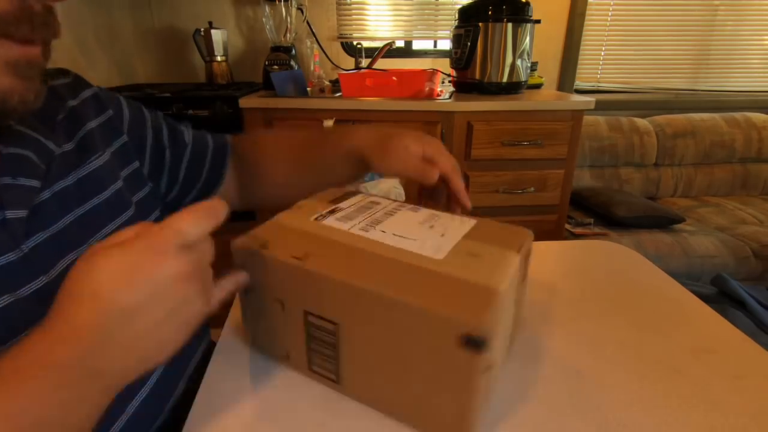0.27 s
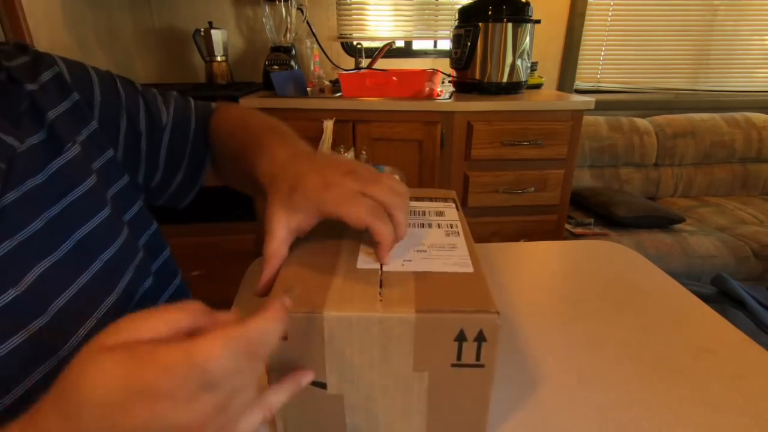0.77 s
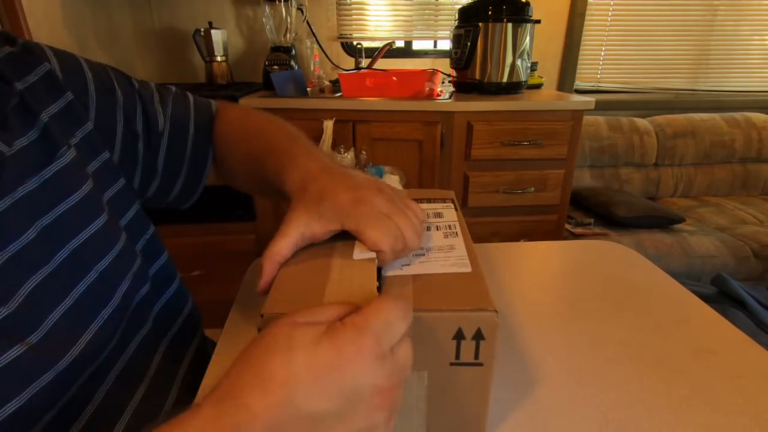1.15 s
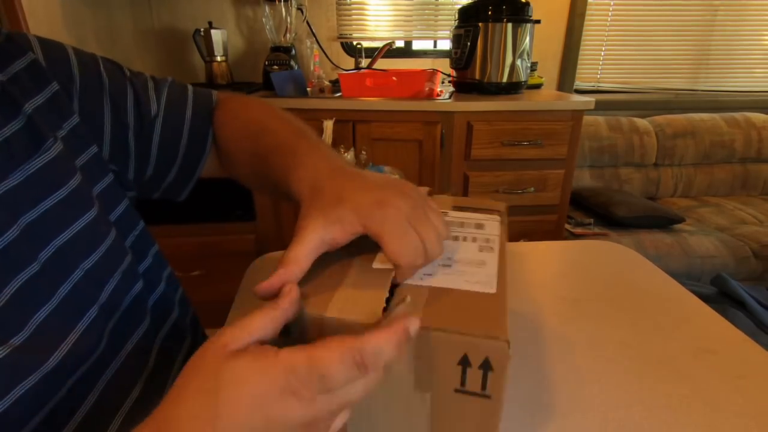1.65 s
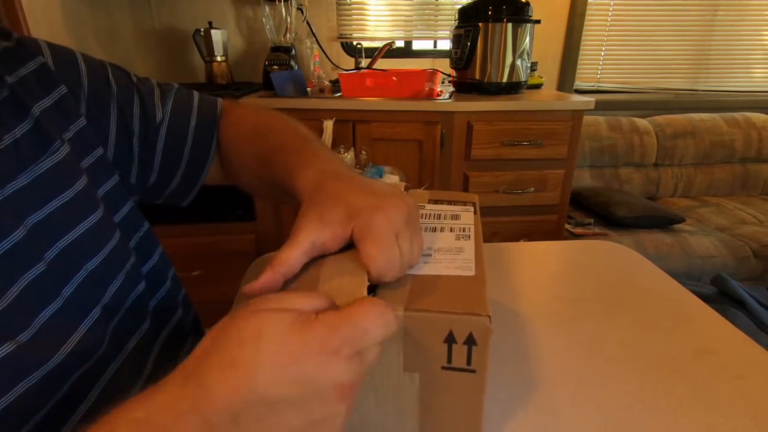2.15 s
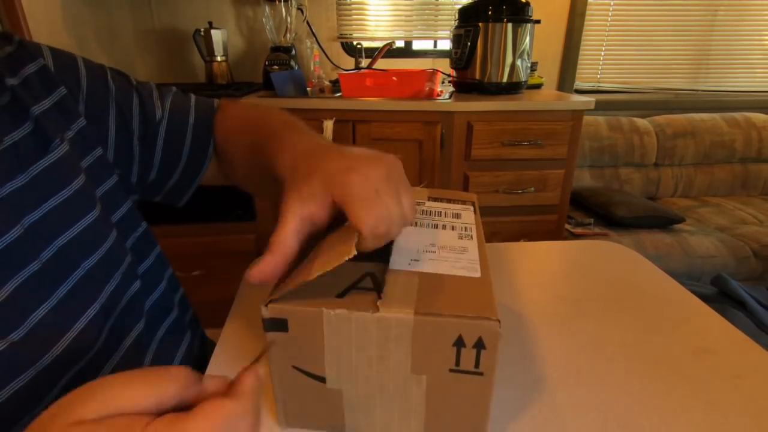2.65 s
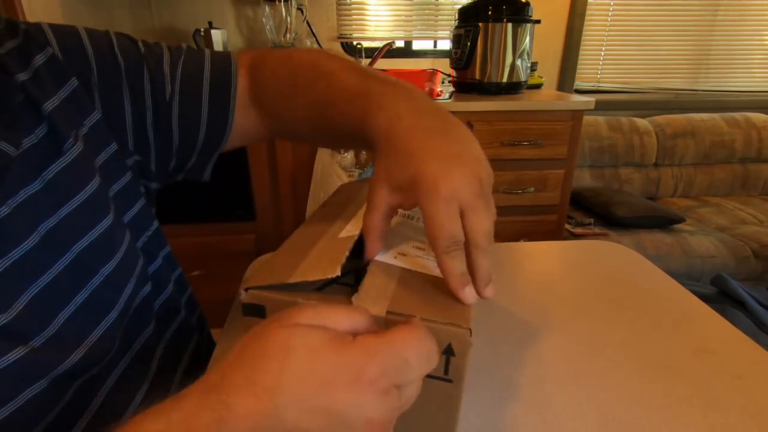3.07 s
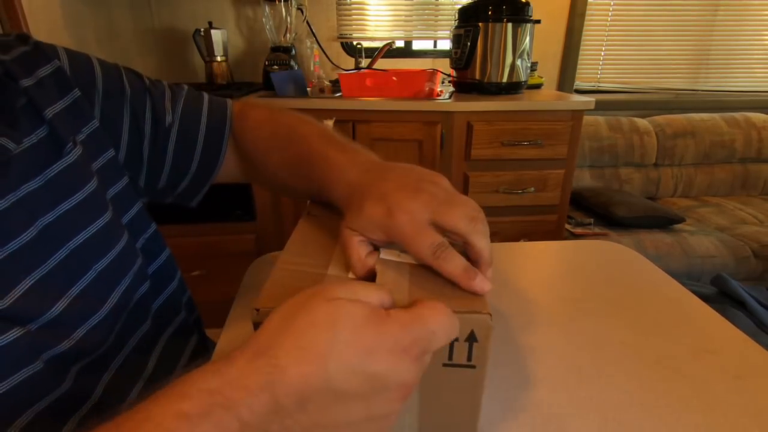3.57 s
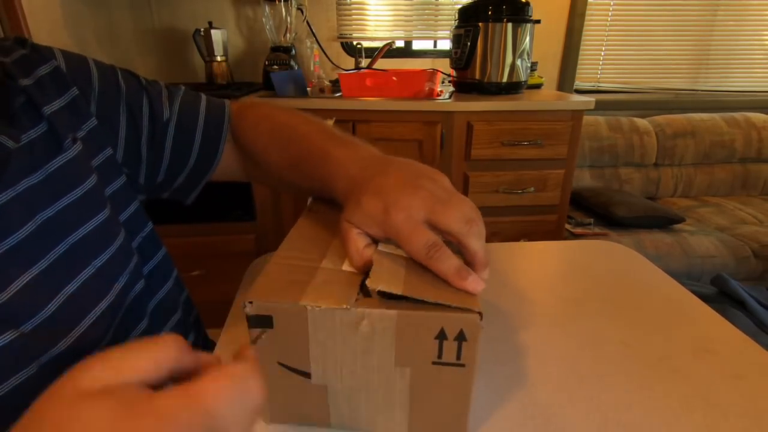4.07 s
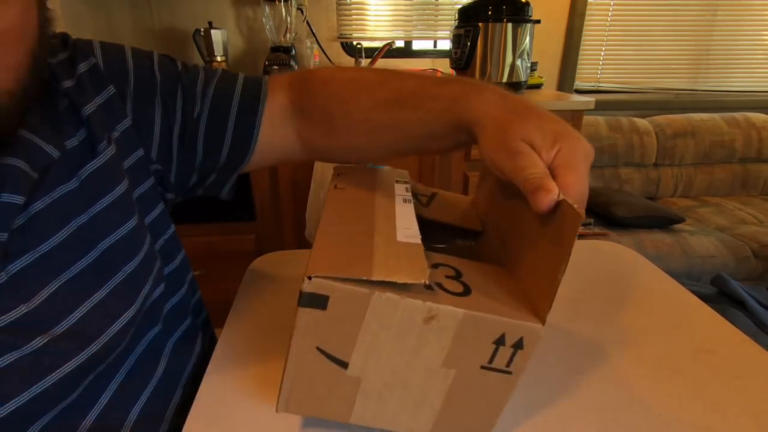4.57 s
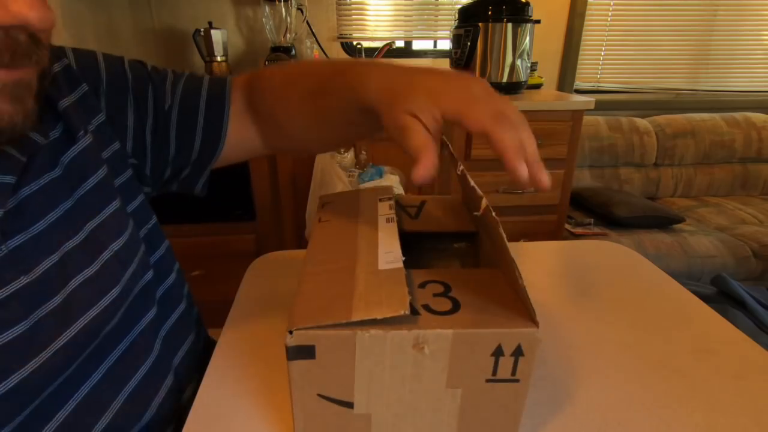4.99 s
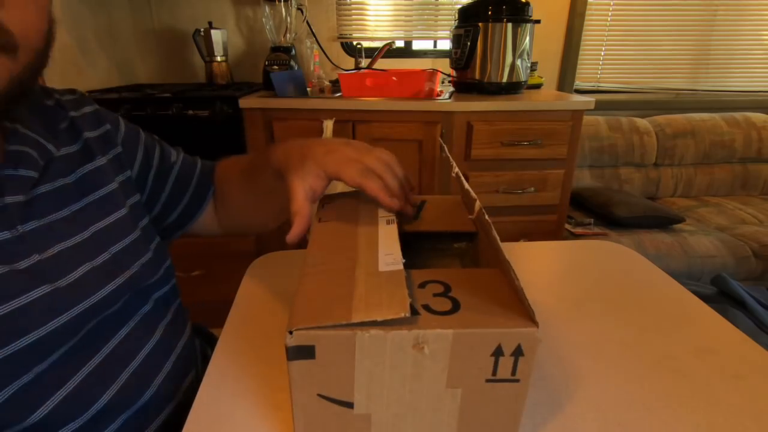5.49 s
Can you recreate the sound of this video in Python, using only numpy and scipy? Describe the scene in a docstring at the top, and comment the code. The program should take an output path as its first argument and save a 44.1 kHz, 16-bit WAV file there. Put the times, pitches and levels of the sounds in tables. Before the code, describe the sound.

Hands tear tape from a cardboard box indoors, snapping and crackling, while the flaps knock and scrape and a sleeve rustles nearby.

```python
"""In a small furnished room, packing tape is torn off a cardboard box on a table and the flaps are opened.
The tape lets go in crackling rips and sharp snaps. Flaps and walls knock hollowly, stiff edges click
and squeak, hands scrape over the cardboard, and the box judders as it is pushed over the table.
A shirt swishes close to the microphone and shakes it as the arms move. A faint hiss lies underneath."""
import sys
import numpy as np
from scipy import signal
from scipy.fft import rfft, irfft, next_fast_len
from scipy.io import wavfile
from scipy.ndimage import uniform_filter1d, map_coordinates

SR = 44100
rng = np.random.default_rng(int(sys.argv[2]) if len(sys.argv) > 2 else 0)


def materialize(psi):
    """Save the field psi as 16-bit PCM at rate SR to the path in sys.argv[1].

    A 1-D psi becomes a single channel; in a 2-D psi each row is a channel.
    """
    bounded = np.clip(np.atleast_2d(psi).T, -1, 1)
    quanta = np.round(bounded * 32767).astype(np.int16)
    wavfile.write(sys.argv[1], SR, quanta)


N = 253134

# The tone of a dry crack. Each row: frequency in Hz, level in dB.
CRACK_TONE = [(200, -10.5), (800, 2), (1900, 5.5), (3200, -0.5), (4300, 7), (6500, -4), (8000, -20),
              (11000, -41), (13500, -24), (16000, -18.5)]
# The tone of rubbed cardboard. Each row: frequency in Hz, level in dB.
CARDBOARD_TONE = [(200, -6.5), (500, 1), (820, -10), (1150, -11), (1900, -7), (3000, -9.5), (5000, -18),
                  (9000, -54.5), (14000, -54.5)]
# Arm movements, which move both sleeve and hand. Each row: start and end in seconds, level in dB.
ARM_STROKES = [(0.088, 0.396, -43.5), (0.45, 0.633, -50), (0.682, 0.94, -45), (0.885, 1.35, -48.5),
               (1.204, 1.66, -51), (1.568, 2.016, -49), (1.99, 2.14, -52), (2.126, 2.41, -50.5),
               (2.411, 2.737, -38.5), (3.16, 3.357, -40.5), (3.285, 3.772, -44), (3.632, 4.029, -49.5),
               (4.065, 4.338, -38.5), (4.36, 4.485, -52.5), (4.49, 4.597, -54.5), (4.571, 5.136, -37),
               (4.777, 5.017, -44.5), (5.283, 5.36, -50.5), (5.366, 5.594, -42.5), (5.501, 5.646, -35),
               (5.607, 5.8, -36)]


def tape_rips(ring_db=-6, rustle_db=-36, rustle_s=0.38):
    """Glue threads and fibres part in a swelling shower; each one tugs the tape and the box under it."""
    # Each row: climax in seconds, tape level and box level in dB, build-up and fade in seconds,
    # pitch of the torn patch in Hz, its level in dB compared with the crackle.
    rips = [(0.031, -40, -37, 0.0034, 0.087, 840, -17), (0.598, -29, -32, 0.002, 0.062, 895, 5.5),
            (0.825, -33, -29, 0.003, 0.046, 800, -12), (0.879, -23, -17.5, 0.0076, 0.15, 3400, -7),
            (0.889, -26.5, -29.5, 0.003, 0.22, 1590, -1.5), (0.927, -32, -42, 0.0071, 0.085, 5560, -5.5),
            (1.019, -30, -28, 0.014, 0.07, 1950, -8), (1.681, -25, -17, 0.008, 0.14, 723, 0.5),
            (1.924, -34, -42.5, 0.022, 0.11, 775, -6), (2.407, -40.5, -30, 0.0092, 0.15, 820, -9.5),
            (2.499, -19.5, -29.5, 0.0083, 0.32, 1750, -9.5), (2.562, -15, -15, 0.0035, 0.066, 1410, -12),
            (3.162, -10.5, -16.5, 0.0071, 0.059, 916, 3.5), (3.194, -19, -24, 0.014, 0.079, 1560, 0.5),
            (3.26, -25.5, -26, 0.0068, 0.06, 1310, -3), (3.875, -23.5, -28.5, 0.008, 0.059, 2470, -20)]
    # The tone of crackling tape. Each row: frequency in Hz, level in dB.
    tape_tone = [(150, -29), (600, 13.5), (1200, 1.5), (2300, 7), (3300, 7), (4400, 1.5), (5300, 8.5),
                 (6500, 6), (8000, -7), (11000, -37), (13500, -29.5), (16000, -38.5)]
    # How stretched tape rings on stiff cardboard. Each row: pitch in Hz, width in Hz, level in dB.
    tape_modes = [(1170, 79, -5.5), (1750, 84, 17.5), (2630, 160, 12), (3620, 84, -2), (4560, 320, 17.5),
                  (6030, 90, 18)]
    out, crackle = np.zeros(N), colour(tape_tone)
    threads = grains(per_second=2600, spread_db=2.5)
    t = np.arange(-SR // 10, SR // 2) / SR  # zero is the climax
    for at, tape_db, box_db, rise, fade, patch_hz, patch_db in rips:
        swell = np.exp(np.minimum(t, 0) / rise)  # the tear runs away with itself
        after = np.maximum(t, 0)
        rustle = amp(rustle_db) * decay(after, rustle_s)  # the freed tape rustles on
        pull = swell * np.maximum(decay(after, fade), rustle)
        first = round((at + t[0]) * SR)
        shower = pull * np.roll(threads, -first)[:len(t)]
        sheet = amp(ring_db) * ringing(tape_modes, detune=0.005)
        patch = amp(patch_db) * resonance(patch_hz, sharpness=3)
        response = amp(tape_db - 8.5) * (crackle + sheet + patch) + amp(box_db) * box_ring()
        add(out, at + t[0], through(shower[max(-first, 0):], response))
    return out


def tape_snaps(splinter_db=-15, splinter_s=0.017):
    """Tight tape breaks with a crack and a brief splintering; its loose end and the box both ring."""
    # Each row: time in seconds, level in dB, pitch of the loose end in Hz,
    # then the levels of that end and of the box in dB compared with the crack.
    snaps = [(0.0253, -17.5, 3280, -22, 1), (0.5724, -25.5, 5800, -5, -8), (0.5896, -16, 3320, -7, 5.5),
             (0.6005, -19.5, 4500, -7.5, -2), (2.4146, -18.5, 4760, -4.5, 9), (2.49, -1.5, 4120, -6, -2),
             (2.5037, -8, 4250, -1.5, -4), (2.5528, 4.5, 4000, -4, -8), (2.5577, -1.5, 4430, -10, 6),
             (3.161, -4.5, 4500, -5, -13), (3.195, -8, 4420, 2.5, -6.5), (3.8708, -16, 2590, -3, 1)]
    out, crack = np.zeros(N), colour(CRACK_TONE)
    t = np.arange(SR // 20) / SR
    for at, db, hz, end_db, box_db in snaps:
        burst = amp(splinter_db) * decay(t, splinter_s) * rng.standard_normal(len(t))
        burst[0] = -0.75  # the break itself
        loose_end = amp(end_db) * resonance(hz, sharpness=12)
        add(out, at, amp(db) * through(burst, crack + loose_end + amp(box_db) * box_ring()))
    return out


def flap_knocks(attack_s=0.0016, give_s=0.001973, swings=9.6, overtone=1.724):
    """A bump scuffs the cardboard; once it gives way, the panel swings at its pitch and rings the box."""
    # Each row: time in seconds, level in dB, panel pitch in Hz, box ring in dB compared with the panel.
    knocks = [(0.098, -27, 151, -17), (0.166, -32.5, 244, 0.5), (0.283, -40.5, 295, 4.5),
              (0.485, -28.5, 276, -23), (0.588, -27, 445, -21), (0.748, -32, 236, -14),
              (0.819, -20.5, 150, -14), (0.869, -15.5, 246, -1.5), (0.8875, -6.5, 335, -18),
              (0.958, -12, 286, -1.5), (1.156, -26.5, 447, 0), (1.274, -34.5, 288, -1.5),
              (1.373, -20.5, 224, -4.5), (1.447, -25, 225, -5.5), (1.679, -3, 216, -3),
              (1.705, -14.5, 419, -14), (1.926, -21, 307, -38), (1.966, -30.5, 260, -7),
              (2.109, -29, 430, -8), (2.272, -21, 343, -3), (2.413, -26.5, 238, -6), (2.551, -6, 414, -21),
              (2.555, -13, 188, -27), (2.573, -12.5, 251, -8), (2.7225, -2.5, 292, -2),
              (2.977, -33.5, 199, -3), (3.159, -8.5, 177, -12), (3.1835, -5.5, 242, -19),
              (3.313, -35, 295, 6), (3.554, -33, 257, -13), (3.761, -47.5, 272, 17.5),
              (4.63, -14, 265, -21), (5.581, -29.5, 277, -4)]
    out, cardboard = np.zeros(N), colour(CARDBOARD_TONE)
    for at, db, hz, ring_db in knocks:
        ring = box_ring()
        t = np.arange(len(ring)) / SR
        press = 1 - np.exp(-(t / attack_s) ** 2)
        low, high = [-np.sin(2 * np.pi * f * t) * decay(t, swings / f) for f in (hz, overtone * hz)]
        panel = press * (low + amp(ring_db - 2) * high)  # it bends in two ways at once
        scuff = through(rng.standard_normal(len(t)) * decay(t, fade_s=0.025) * press, cardboard)
        thump = panel / np.abs(panel).max() + amp(ring_db) * press * ring / np.abs(ring).max()
        add(out, at, amp(db + ring_db - 22) * scuff)  # a soft bump neither rings nor scuffs much
        add(out, at + give_s, amp(db - 1) * thump)
    return out


def box_ring():
    """The hollow answer of the box to one push."""
    # Each row: pitch in Hz, width in Hz (wider dies away sooner), level in dB.
    box_modes = [(152, 20, -1), (263.4, 22, 1.5), (394.7, 51, -1.5), (468, 42, -0.5), (613, 7, -25.5),
                 (770, 102, -6.5), (890, 69, -12.5), (1147, 110, -22), (1346, 170, -38.5),
                 (1660, 52, -34.5), (1864, 32, -21)]
    return ringing(box_modes, detune=0.025)


def edge_clicks(fade_s=0.032, ring_db=2):
    """The cut edge of a flap catches and lets go: a dry crack with a hint of pitch."""
    # Each row: time in seconds, level in dB, pitch in Hz.
    clicks = [(0.435, -15, 800), (0.8949, 1.5, 1600), (1.159, -2, 780), (1.372, -19, 1710),
              (1.391, -15, 1490), (1.673, -8, 1550), (1.707, -5, 1600), (2.096, -19, 810),
              (2.4889, 3, 1700), (2.724, -10, 3300), (2.726, 9, 680), (3.046, -7, 830), (3.1606, 17, 865),
              (3.164, 10.5, 475), (3.186, 18, 503), (3.872, -2, 520), (5.187, -23.5, 1650),
              (5.463, -16.5, 1560)]
    out, crack = np.zeros(N), colour(CRACK_TONE)
    t = np.arange(SR // 20) / SR
    for at, db, hz in clicks:
        burst = unit_energy(decay(t, fade_s) * rng.standard_normal(len(t)))
        edge = amp(ring_db) * resonance(hz, sharpness=3)
        dull_crack = signal.sosfilt(signal.butter(2, 2 * hz, fs=SR, output="sos"), crack)
        add(out, at, amp(db - 8.5) * through(burst, dull_crack + edge))
    return out


def hand_scrapes(ring_db=2, roam_octaves=0.19, hand_db=-12.5, hand_hz=778):
    """Skin and paper edges stick and slip, ringing one patch of cardboard after another."""
    # Each row: start and end in seconds, level in dB, pitch of the middle patch in Hz.
    scrapes = [(0.009, 0.067, -35.5, 815), (0.72, 0.85, -47, 830), (0.985, 1.172, -38.5, 887),
               (1.695, 1.926, -39, 780), (2.165, 2.302, -43, 1130), (2.388, 2.495, -38.5, 1930),
               (3.051, 3.078, -43, 830), (3.443, 3.514, -39, 845), (3.161, 3.176, -13.5, 870),
               (3.244, 3.295, -32, 1270), (3.799, 3.92, -38, 806), (4.13, 4.297, -46.5, 2320),
               (4.58, 5.117, -46.5, 2080), (4.83, 4.906, -41.5, 2150), (4.939, 4.996, -38.5, 1730)]
    out, cardboard = np.zeros(N), colour(CARDBOARD_TONE)
    slips = grains(per_second=1800, spread_db=1) * amp(2.3 * wobble(50))
    place = np.clip(wobble(14), -1, 1)  # the hand wanders over three patches, at -1, 0 and 1
    light_touches = [(start, end, db + hand_db, hand_hz) for start, end, db in ARM_STROKES]
    for start, end, db, hz in scrapes + light_touches:
        contact = amp(db - 13.5) * rub(slips, start, end, fullness=9.5)
        here = np.roll(place, -round(start * SR))[:len(contact)]
        add(out, start, through(contact, cardboard))
        for spot in (-1, 0, 1):
            touch = np.sqrt(np.maximum(1 - np.abs(here - spot), 0))
            patch = resonance(hz * 2 ** (spot * roam_octaves), sharpness=10)
            add(out, start, amp(ring_db) * through(contact * touch, patch))
    return out


def edge_squeaks(sharpness=9):
    """Tiny slips ring a stiff edge, whose pitch slides as the point of contact moves along it."""
    # Each row: start and end in seconds, level in dB, first and last pitch in Hz.
    squeaks = [(1.006, 1.199, -45.5, 980, 840), (2.11, 2.32, -52, 800, 760),
               (3.843, 3.909, -40, 2380, 2210), (4.33, 4.472, -55, 4800, 5030),
               (4.502, 4.623, -61, 3340, 3460), (5.203, 5.211, -53.5, 3350, 3200),
               (5.222, 5.343, -63, 2950, 2600)]
    out, slips = np.zeros(N), grains(per_second=2500, spread_db=1)
    for start, end, db, first_hz, last_hz in squeaks:
        contact = rub(slips, start, end, fullness=3)
        pitch = np.linspace(first_hz, last_hz, len(contact))
        turn = np.exp(2j * np.pi * np.cumsum(pitch) / SR)
        kept_per_sample = np.exp(-np.pi * first_hz / sharpness / SR)
        ring = turn * signal.lfilter([1], [1, -kept_per_sample], contact / turn)  # follows the pitch
        add(out, start, amp(db) * unit_level(ring.imag))
    return out


def box_judders():
    """The bottom of the box catches on the table and shakes one of the walls."""
    # Each row: start and end in seconds, level in dB, pitch of the wall in Hz.
    judders = [(0.012, 0.197, -39, 207), (0.855, 0.984, -28.5, 100), (0.887, 0.97, -25, 250),
               (0.965, 1.227, -40, 450), (1.35, 1.5, -35.5, 233), (1.654, 1.775, -32, 107),
               (3.429, 3.523, -37, 430), (3.778, 3.936, -38, 272), (4.153, 4.363, -44, 245),
               (5.36, 5.744, -43.5, 383)]
    out, slips = np.zeros(N), grains(per_second=1300, spread_db=2.5)
    for start, end, db, hz in judders:
        wall = unit_energy(through(resonance(hz, sharpness=1.5), resonance(hz, sharpness=1.5)))
        add(out, start, amp(db) * through(rub(slips, start, end, fullness=2.03), wall))
    return out


def sleeve_swishes(middling_db=-41, flutter_start=2.7, flutter_stroke_s=0.0868, flutter_db=-44):
    """Cloth fibres slide past each other; a faster stroke is louder and brighter."""
    # The tone of sliding cloth. Each row: frequency in Hz, level in dB.
    cloth_tone = [(300, -36), (1100, -20), (2000, -7.5), (3000, -5), (4300, 0.5), (5900, 4.5), (7000, -2.5),
                  (8500, -14.5), (11000, -29), (13000, -25), (16000, -30.5)]
    out = np.zeros(N)
    fibres = amp(1.8 * wobble(60)) * grains(per_second=6000, spread_db=1.5)
    turns = flutter_start + flutter_stroke_s * np.arange(5)  # a sleeve brushes quickly to and fro
    flutter = [(at, at + flutter_stroke_s, flutter_db) for at in turns]
    for start, end, db in ARM_STROKES + flutter:
        db_per_octave = -4.5 + 0.4 * (db - middling_db)
        folds_db = 0.5 * rng.standard_normal(len(cloth_tone))  # the cloth lies differently each time
        cloth = colour([(hz, level + fold + db_per_octave * np.log2(hz / 5000))
                        for (hz, level), fold in zip(cloth_tone, folds_db)])
        add(out, start, amp(db - 2.5) * through(rub(fibres, start, end, fullness=2.49), cloth))
    return out


def creases(swish, depth_db=2):
    """Moving creases bring out ever-changing parts of the swish, some high and some low."""
    bands = signal.stft(swish, nperseg=512)[2]
    pattern = uniform_filter1d(rng.standard_normal(bands.shape), size=6, axis=0)  # smooth over pitch
    pattern = uniform_filter1d(pattern, size=12, axis=1)  # and over time
    return signal.istft(bands * amp(depth_db * unit_level(pattern)), nperseg=512)[1][:N]


def box_shuffle():
    """The box shifts on the table: small slips ring it hollowly and make a low dragging sound."""
    # How strongly it shifts. Each row: time in seconds, level in dB.
    shifting = [(0.0, -41), (0.29, -47), (0.83, -52), (0.99, -65), (1.21, -48.5), (2.68, -49.5),
                (2.81, -47), (3.32, -48), (4.57, -59.5), (4.87, -51), (5.16, -55), (5.74, -45.5)]
    # The tone of the dragging. Each row: frequency in Hz, level in dB.
    drag_tone = [(70, -30.5), (160, -3.5), (280, -5.5), (420, -29), (1500, -64)]
    db = over_time(shifting)
    hollow = amp(db - 4.5 + 3 * wobble(47)) * through(grains(900, spread_db=1), box_ring())
    drag = amp(db - 1.5 + 0.47 * wobble(40)) * through(grains(450, spread_db=4), colour(drag_tone))
    return hollow + drag


def microphone_rumble():
    """The moving arms rock the microphone, which makes a deep rumble."""
    # How strongly it rocks. Each row: time in seconds, level in dB.
    rocking = [(0.0, -54), (0.85, -43), (0.93, -27), (1.34, -45), (1.98, -38), (2.17, -48), (2.65, -38),
               (3.13, -50), (3.23, -31.5), (3.82, -68), (3.88, -34.5), (4.09, -55.5), (4.37, -35),
               (4.58, -47.5), (4.7, -36.5), (5.05, -36.5), (5.28, -53), (5.37, -31.5), (5.511, -29),
               (5.74, -43.5)]
    # The tone of the rumble. Each row: frequency in Hz, level in dB.
    rumble_tone = [(10, -13.5), (27, 9), (40, -5), (65, -7.5), (100, -19), (180, -14), (500, -39.5),
                   (2000, -110)]
    return amp(over_time(rocking) - 0.5) * through(rng.standard_normal(N), colour(rumble_tone))


def room_echo(sound, delay_s=0.0035):
    """Close walls and soft furniture answer briefly."""
    # Each row: frequency in Hz, seconds the echo takes to fade by 60 dB.
    fade_times = [(150, 0.15), (1000, 0.11), (5000, 0.17), (14000, 0.35)]
    hz, t, bands = signal.stft(rng.standard_normal(SR // 2), SR, nperseg=256)
    fading = bands * decay(t, over_pitch(fade_times, hz)[:, None])
    tail = unit_energy(signal.istft(fading, SR, nperseg=256)[1])
    return through(sound, np.pad(tail, (round(delay_s * SR), 0)))


def faint_hiss(db=-64.5):
    """A steady hiss behind everything."""
    # Each row: frequency in Hz, level in dB.
    hiss_tone = [(100, -27.5), (1000, -1), (6000, 2.5), (8500, -15), (11000, -23), (16000, -43)]
    return amp(db) * through(rng.standard_normal(N), colour(hiss_tone))


def grains(per_second, spread_db):
    """A stream of tiny random slips of uneven size."""
    hit = rng.random(N) < per_second / SR
    direction = rng.choice([-1, 1], N)
    strength = amp(spread_db * np.clip(rng.standard_normal(N), -2, 2))
    return unit_level(hit * direction * strength)


def rub(slips, start, end, fullness):
    """The slips of one stroke that speeds up and slows to rest; more fullness holds its pace longer."""
    progress = np.linspace(0, 1, max(round((end - start) * SR), 64))
    speed = np.tanh(fullness * np.sin(np.pi * progress) ** 2)
    return speed * np.roll(slips, -round(start * SR))[:len(speed)]


def ringing(modes, detune, size=8192):
    """An object's own fading tones (its modes); the grip shifts them a little every time."""
    t, ring = np.arange(size) / SR, np.zeros(size)
    for k, (hz, width, db) in enumerate(modes):
        level_shift, pitch_shift = rng.standard_normal(2)
        tone = np.sin(2 * np.pi * hz * (1 + detune * pitch_shift) * t)
        ring += (-1) ** k * amp(db + 2 * level_shift) * width * np.exp(-np.pi * width * t) * tone
    return unit_energy(ring)


def resonance(hz, sharpness):
    """One fading tone; the sharper it is, the longer it rings."""
    return ringing([(hz, hz / sharpness, 0)], detune=0)


def colour(tone, size=8192):
    """A short click with the given tone; a sound played through it takes on that tone."""
    gains = amp(over_pitch(tone, np.fft.rfftfreq(size, 1 / SR)))
    cepstrum = irfft(np.log(gains))
    cepstrum[size // 2:] = 0  # so nothing sounds before the click starts
    return unit_energy(irfft(np.exp(2 * rfft(cepstrum))))


def through(sound, response):
    """Let every sample of a sound set off the response."""
    return signal.fftconvolve(sound, response)[:N]


def wobble(per_second):
    """A smooth curve through so many random points a second."""
    points = rng.standard_normal(int(N * per_second / SR) + 4)
    return map_coordinates(points, [np.arange(N) * per_second / SR])


def over_pitch(rows, hz):
    """Join rows of frequency and value with lines that are straight on a scale of octaves."""
    frequencies, values = np.transpose(rows)
    return np.interp(np.log(hz + 1), np.log(frequencies + 1), values)


def over_time(rows):
    """Join rows of time and value with straight lines."""
    return np.interp(np.arange(N) / SR, *np.transpose(rows))


def decay(t, fade_s):
    """A fade that drops 60 dB in fade_s seconds."""
    return amp(-60 * t / fade_s)


def amp(db):
    """Turn decibels into a number to multiply by."""
    return 10 ** (np.asarray(db) / 20)


def unit_level(x):
    """Scale so that the squared samples average 1."""
    return x / np.sqrt(np.mean(x ** 2) + 1e-20)


def unit_energy(x):
    """Scale so that the squared samples add up to 1."""
    return x / np.linalg.norm(x)


def add(track, at, sound):
    """Mix a sound into the track at a time in seconds."""
    part = track[max(round(at * SR), 0):][:len(sound)]
    part += sound[:len(part)]


def scene():
    """The box in its room, with the moving arms and a faint hiss, in one channel."""
    box = tape_rips() + tape_snaps() + flap_knocks() + edge_clicks()
    box += hand_scrapes() + edge_squeaks() + box_judders()
    sleeves = creases(sleeve_swishes())
    hiss = faint_hiss()
    echo = room_echo(amp(-4) * box + amp(-7.5) * sleeves)
    return (box + sleeves + echo + box_shuffle() + microphone_rumble() + hiss)[None]


def record(dry, ceiling=1.15, top_hz=15750):
    """Round off the highest peaks and keep nothing above top_hz."""
    rounded = dry / (1 + np.abs(dry / ceiling) ** 6) ** (1 / 6)
    size = next_fast_len(N + SR // 2)
    passed = np.fft.rfftfreq(size, 1 / SR) < top_hz
    return irfft(rfft(rounded, size) * passed, size)[..., :N]


dry = scene()
out = record(dry)
materialize(out)
```